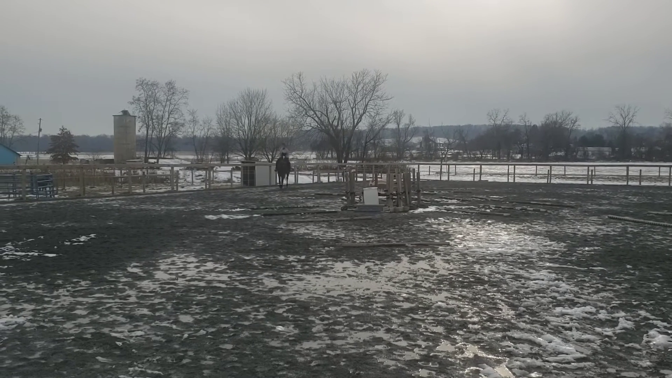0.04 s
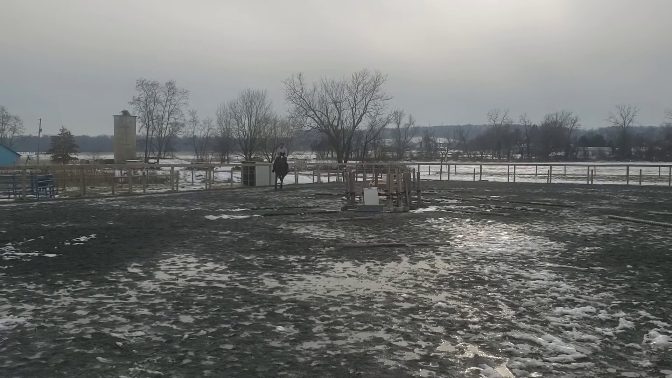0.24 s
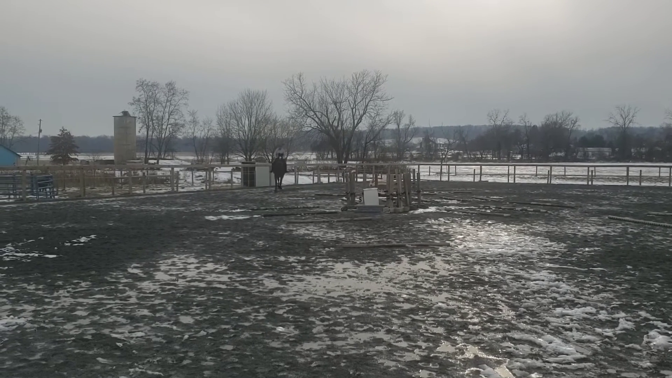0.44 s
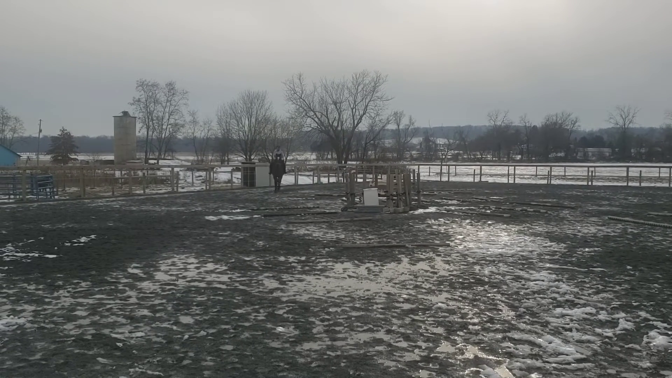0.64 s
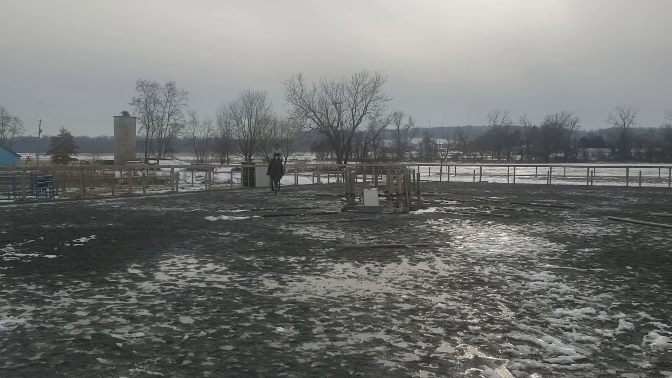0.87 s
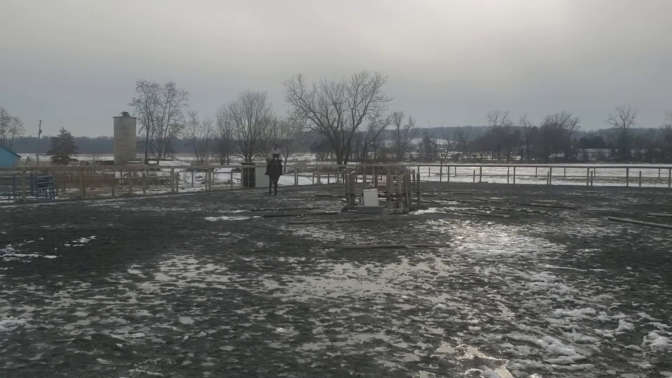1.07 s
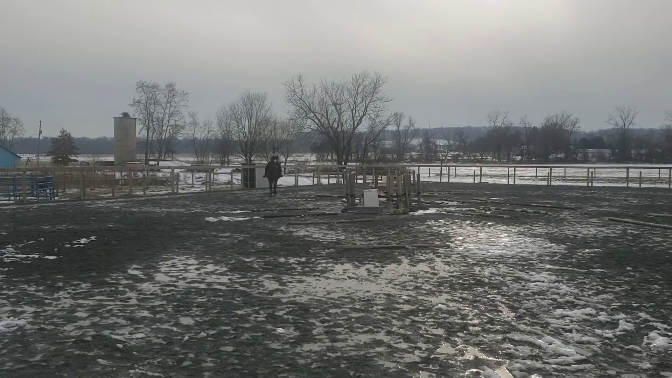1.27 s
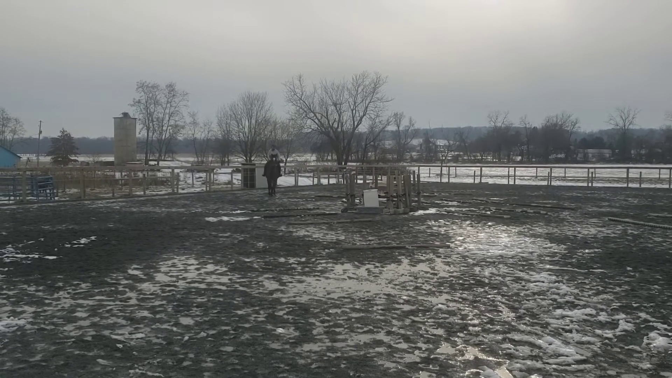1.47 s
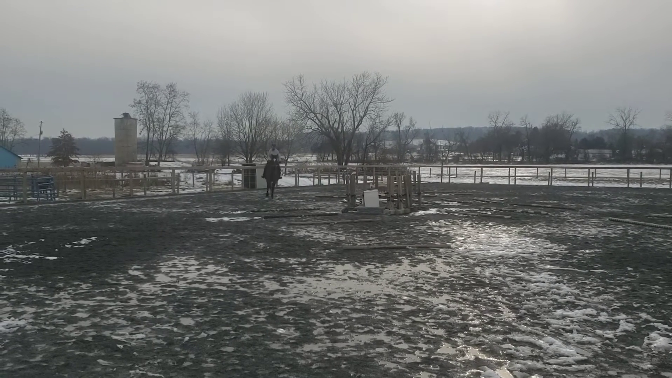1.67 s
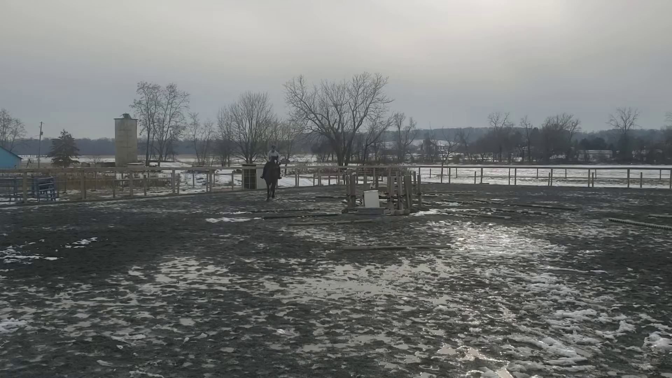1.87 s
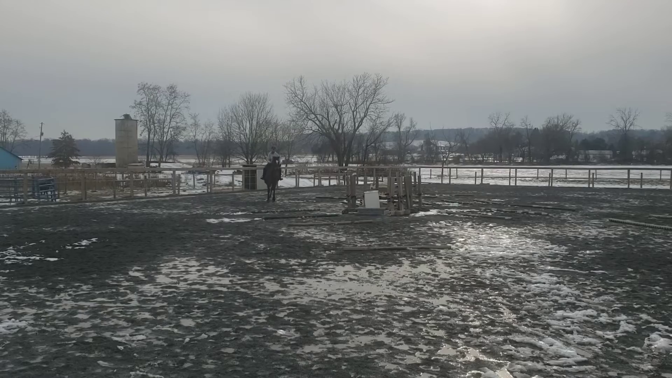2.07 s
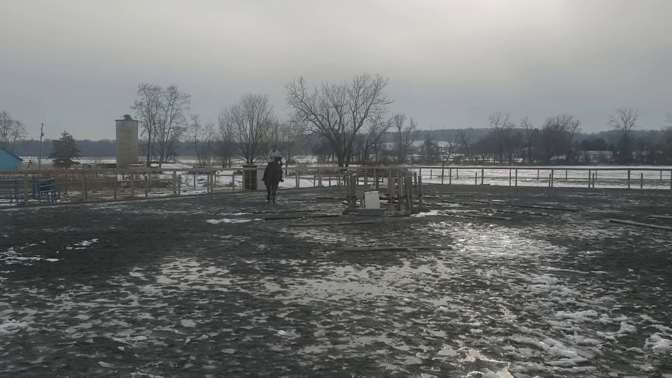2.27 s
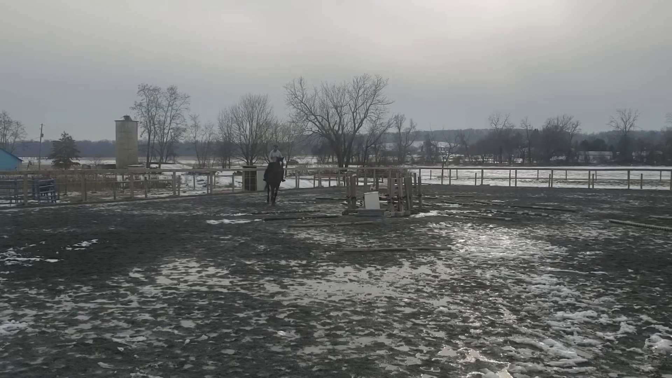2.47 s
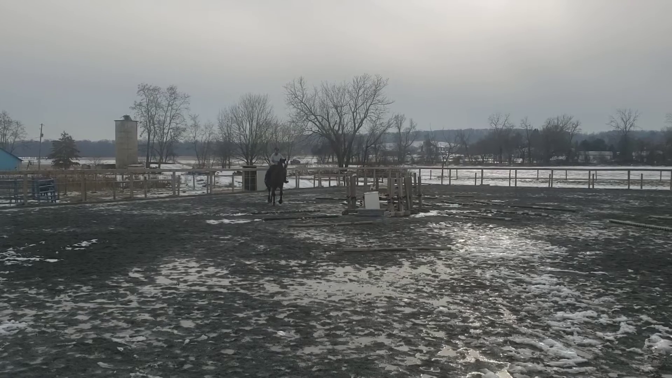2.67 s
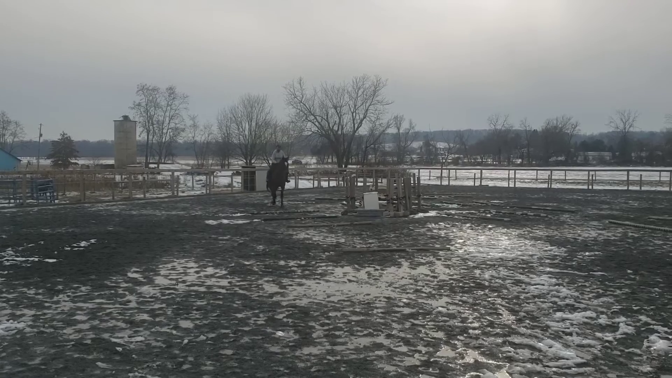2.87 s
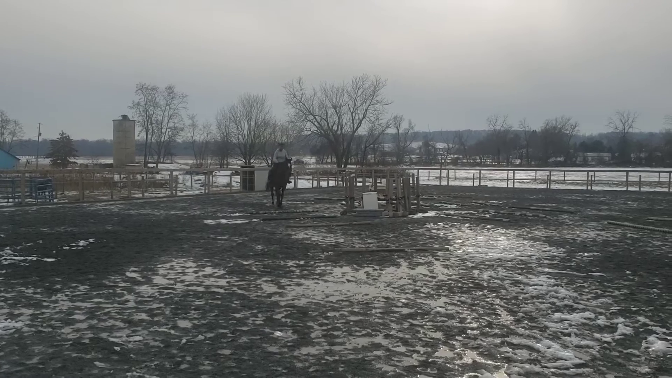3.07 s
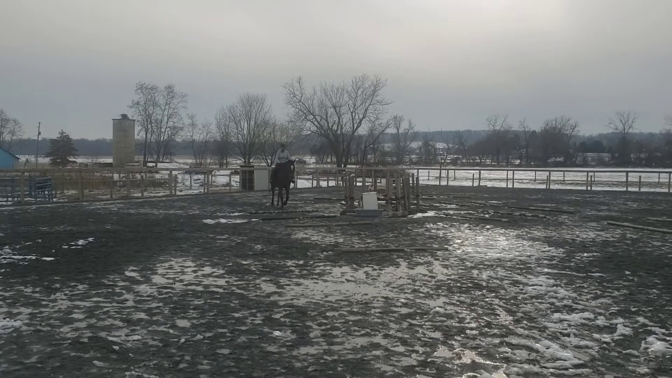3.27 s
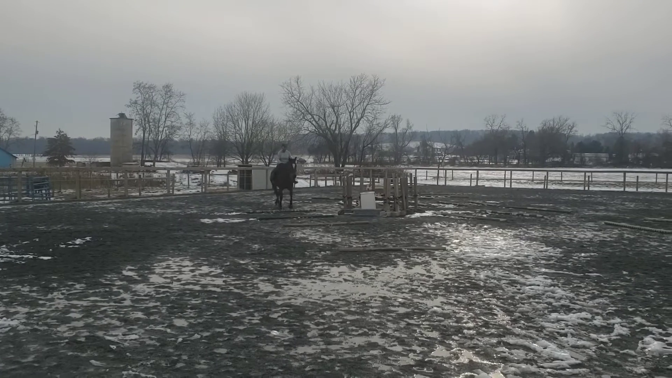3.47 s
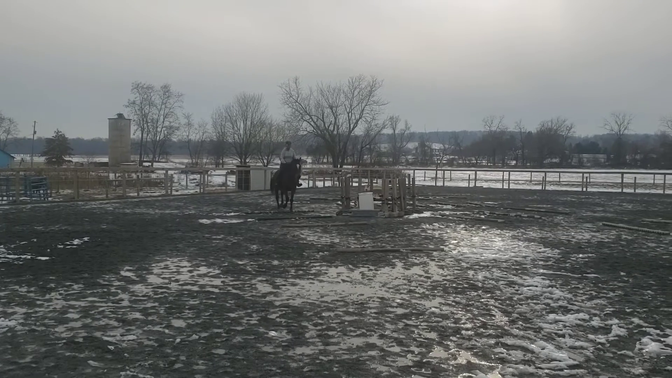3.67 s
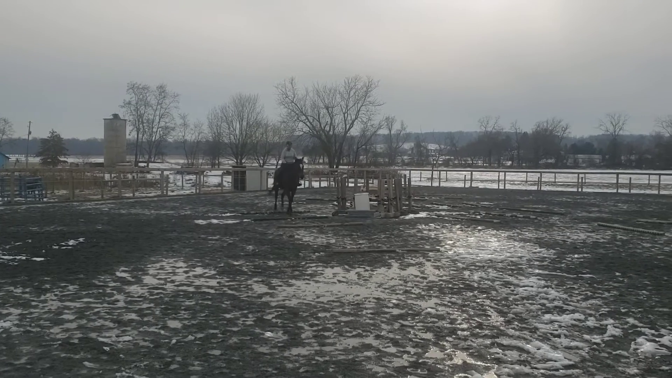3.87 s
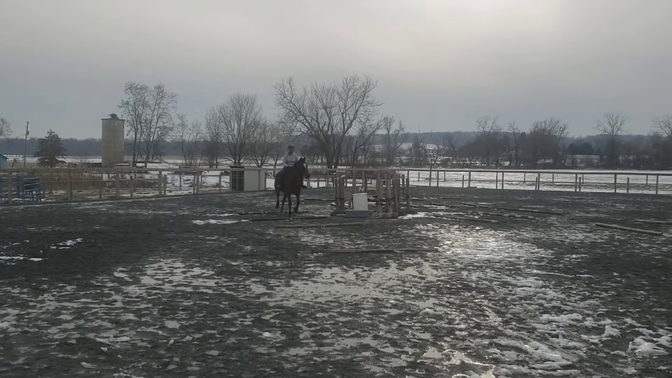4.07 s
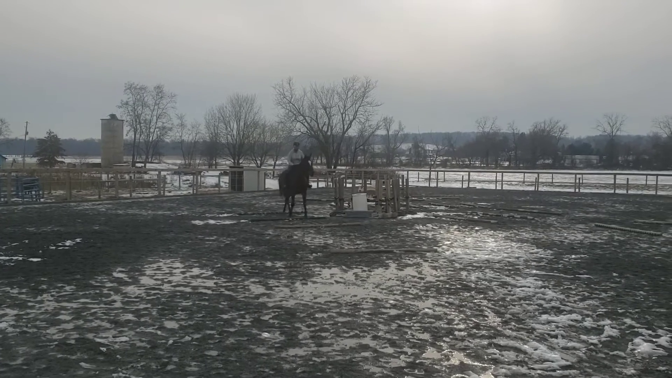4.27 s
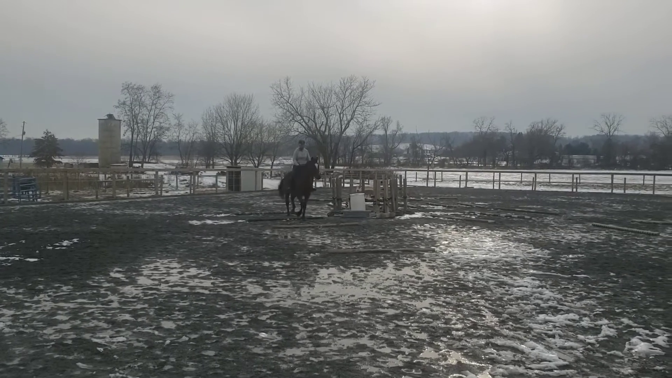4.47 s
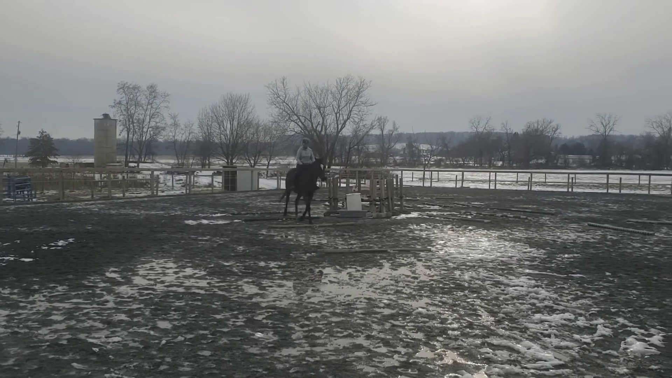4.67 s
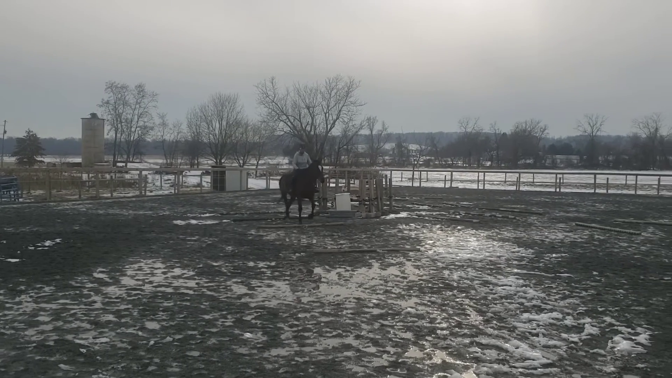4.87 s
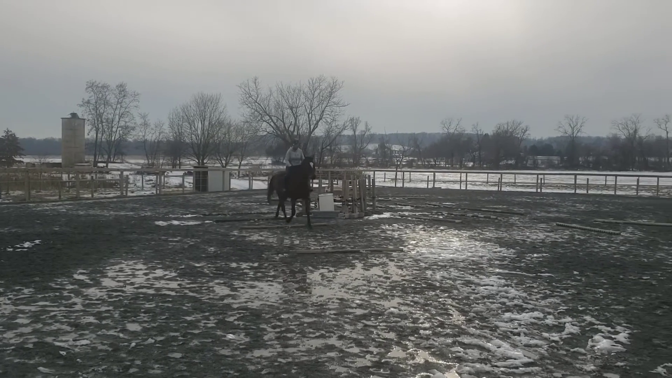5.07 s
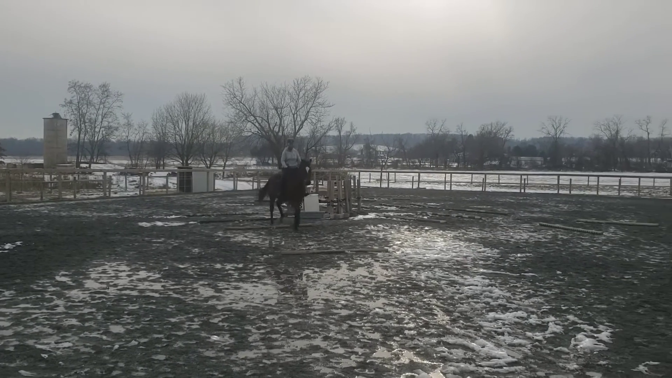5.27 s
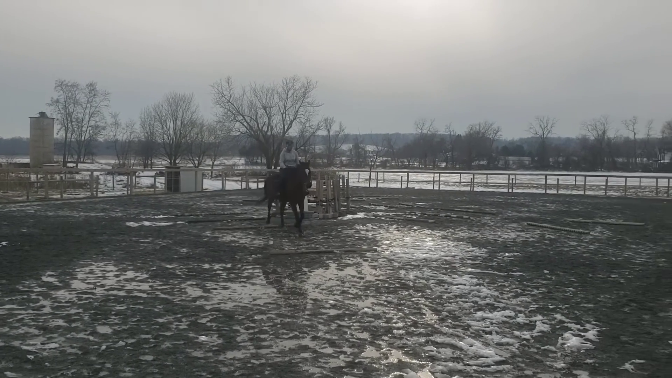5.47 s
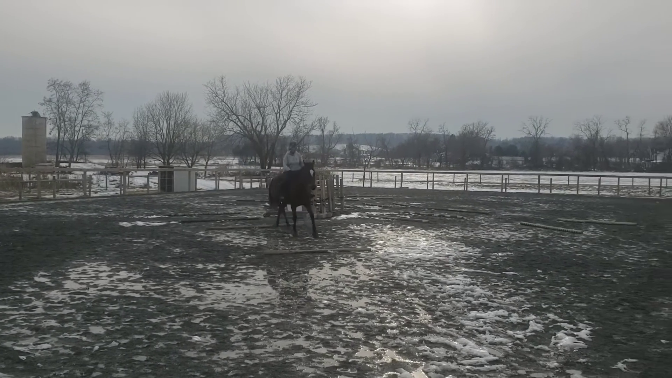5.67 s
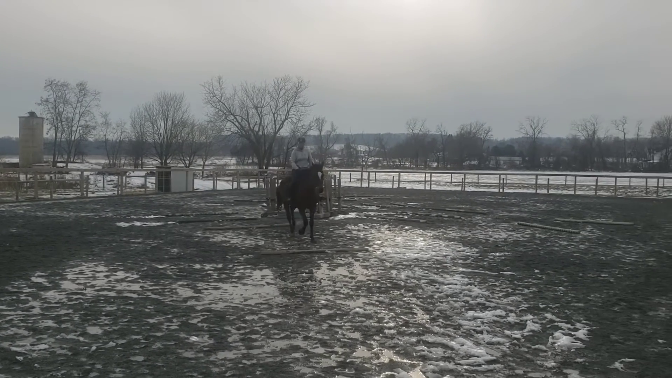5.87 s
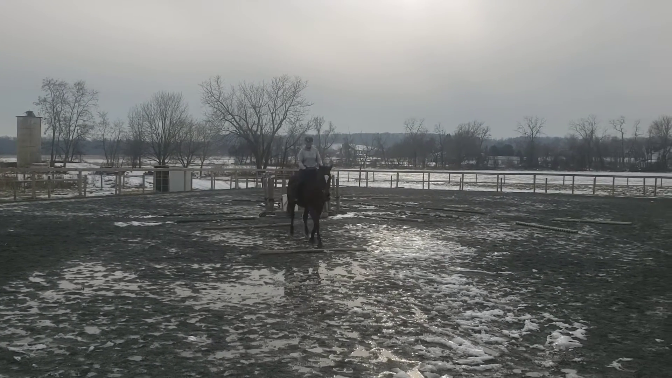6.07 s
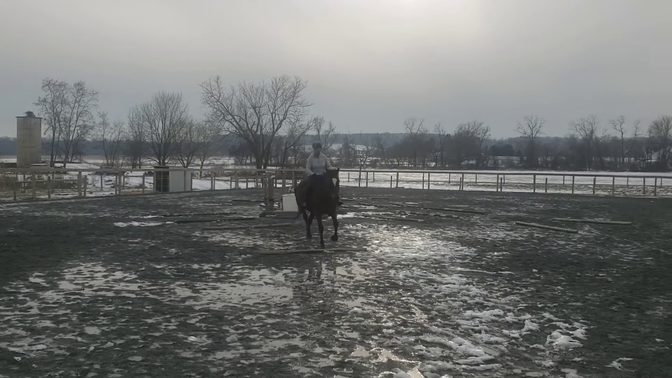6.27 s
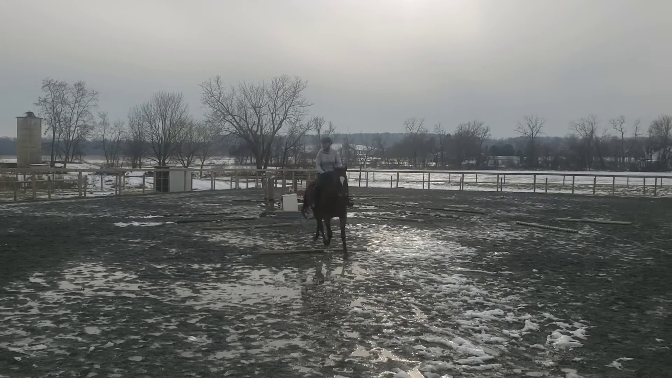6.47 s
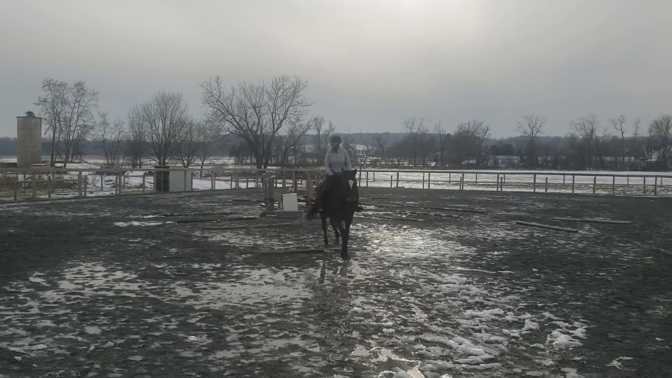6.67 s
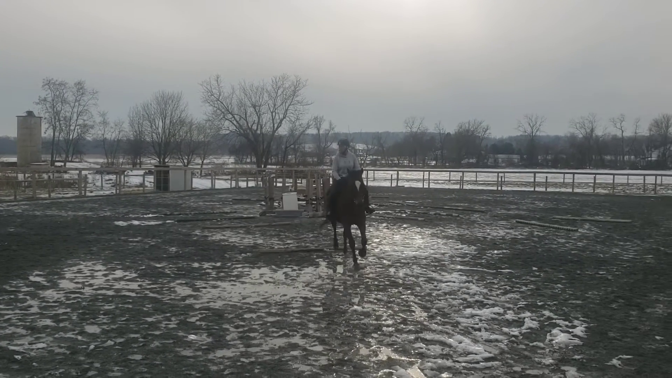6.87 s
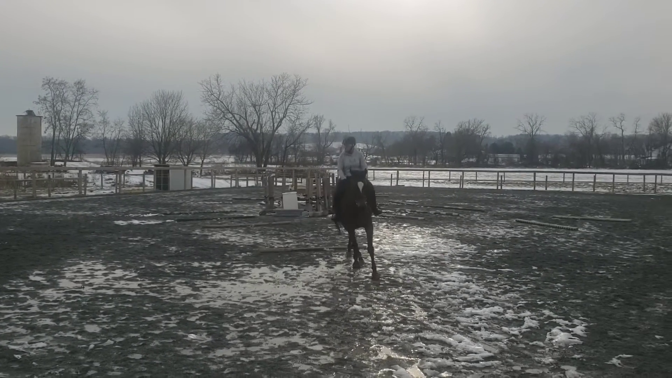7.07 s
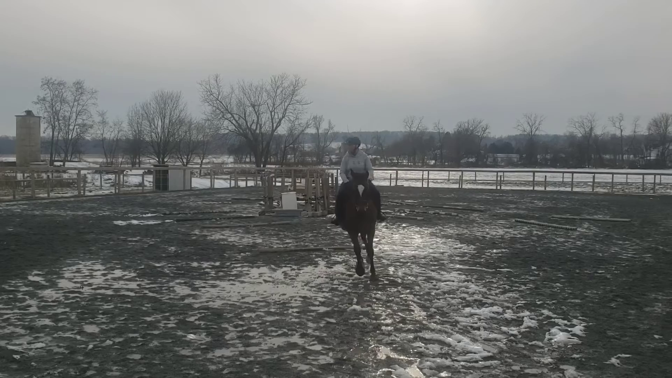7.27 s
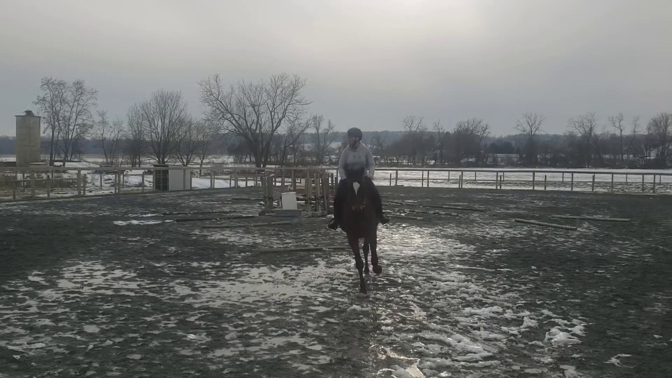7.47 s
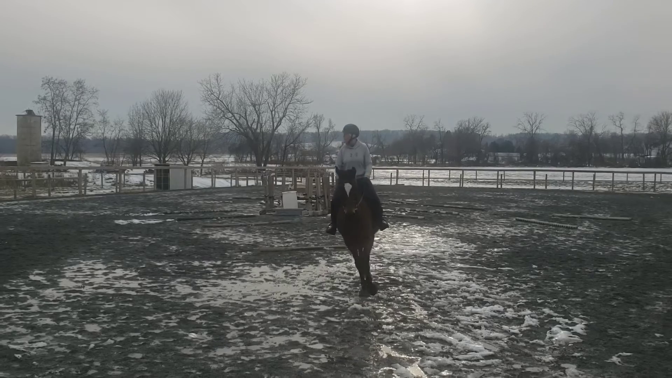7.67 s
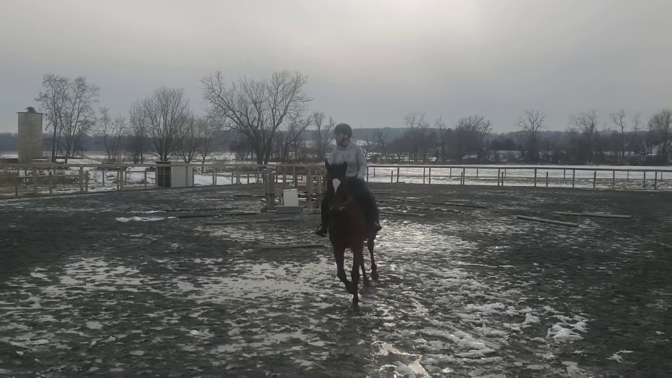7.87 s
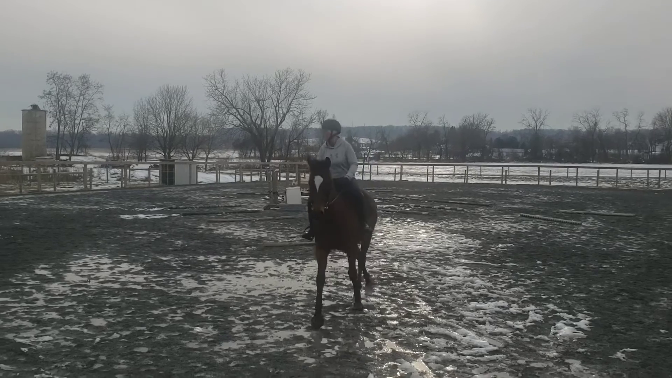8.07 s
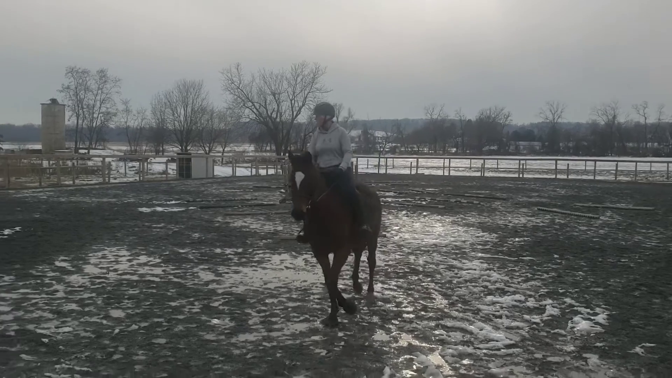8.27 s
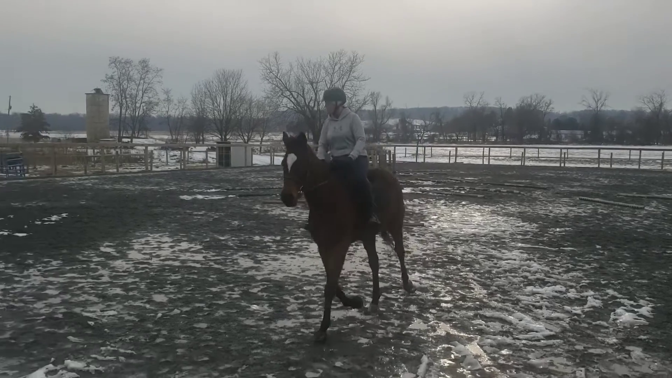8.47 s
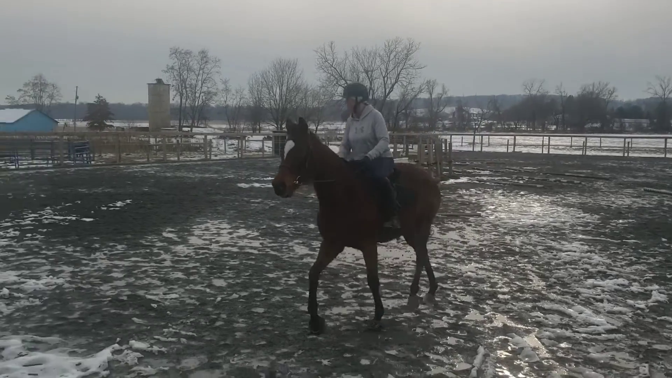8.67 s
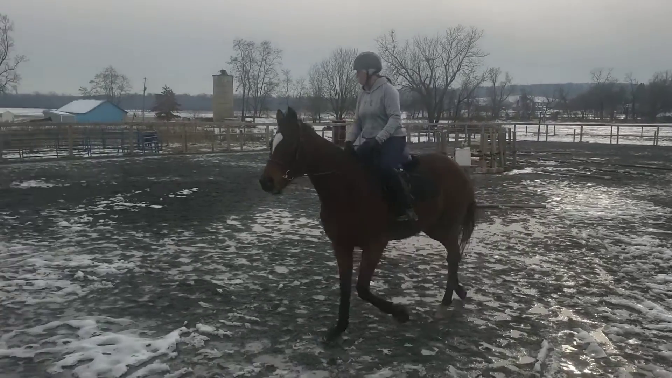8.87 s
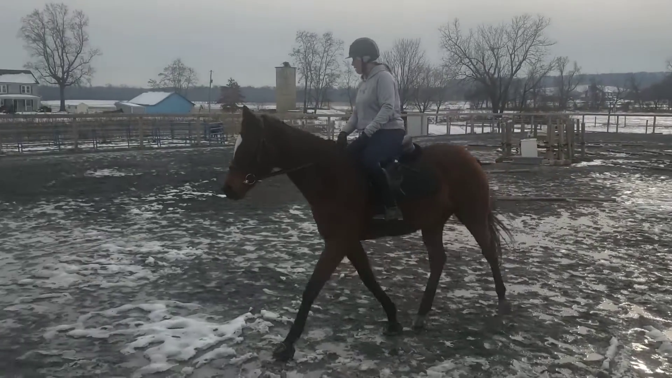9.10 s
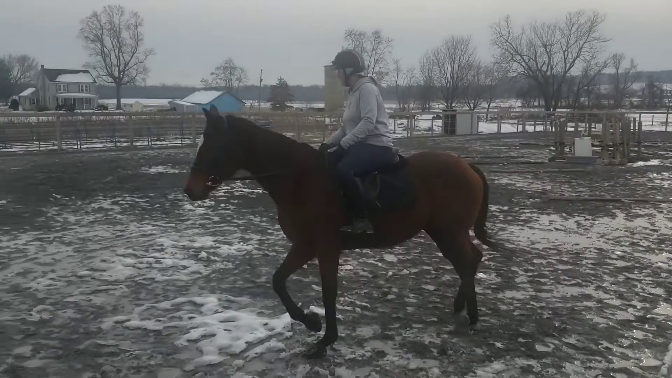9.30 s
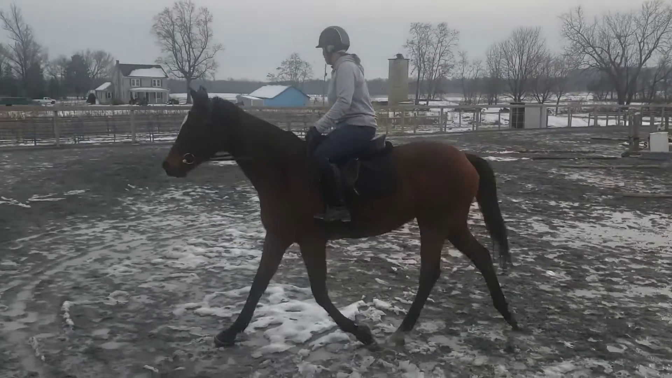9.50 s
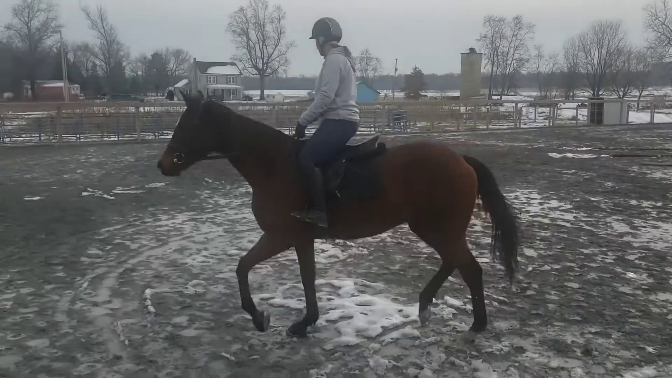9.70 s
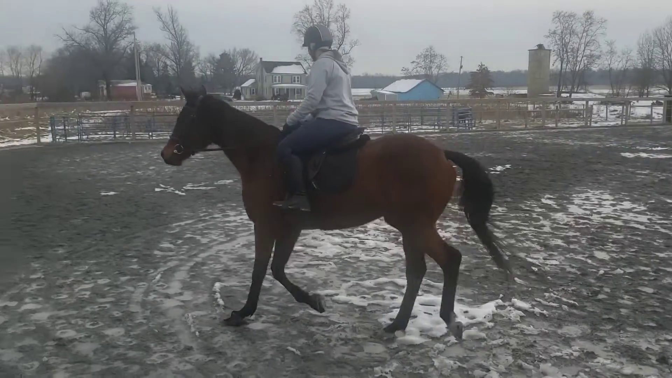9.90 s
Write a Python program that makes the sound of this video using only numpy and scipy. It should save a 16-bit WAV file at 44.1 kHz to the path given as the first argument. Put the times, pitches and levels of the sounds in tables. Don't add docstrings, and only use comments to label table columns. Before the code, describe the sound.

A horse trots closer over icy slush, each hoof crunching, cracking and splashing louder in steady rhythm, above a low engine drone outdoors.

```python
import sys
import numpy as np
from scipy import signal
from scipy.fft import rfft, irfft, next_fast_len
from scipy.io import wavfile
from scipy.ndimage import uniform_filter1d

SR = 44100
rng = np.random.default_rng(int(sys.argv[2]) if len(sys.argv) > 2 else 0)


def volts_from_db(level):
    exponent = np.asarray(level, float) / 20
    return 10 ** exponent


def digitize_waveform(pressure):
    field = np.atleast_2d(pressure).T
    bounded = np.clip(field, -1, 1)
    quanta = np.round(bounded * 32767).astype(np.int16)
    wavfile.write(sys.argv[1], SR, quanta)


N = 438354
HZ = np.fft.rfftfreq(next_fast_len(N), 1 / SR)
TIME = np.arange(N) / SR


def evened(x):
    return x / np.sqrt(np.mean(x ** 2) + 1e-20)


def read(points, hz):
    f, value = np.transpose(points)
    return np.interp(np.log(hz + 1), np.log(f + 1), value)


def over_time(points):
    return np.interp(TIME, *np.transpose(points))


def shaped(x, gain):
    return irfft(rfft(x, next_fast_len(N)) * gain, next_fast_len(N))[..., :N]


def below(edge_hz, order=4):
    return 1 / (1 + (HZ / edge_hz) ** (2 * order))


def drift(per_s, channels=1):
    return evened(shaped(rng.standard_normal((channels, N)), np.sqrt(below(per_s, order=1))))


# f/Hz, phase/rad
PORT_LAG = [(300, 0), (6000, -.3), (11000, -2), (15000, -4.5)]


def crackle(per_s, spread_db, clump_db, pocket_db, same):
    size = volts_from_db(spread_db * np.minimum(rng.exponential(1, (2, N)), 5)) * rng.standard_normal((2, N))
    snapping = rng.random((2, N)) < per_s / SR
    direct, other = size * snapping * volts_from_db(clump_db * drift(270))
    same = same + (.95 - same) * below(1450, order=1)
    right = shaped(direct, same * np.exp(-1j * read(PORT_LAG, HZ)))
    right = right + shaped(other, np.sqrt(1 - same ** 2))
    z = signal.stft(np.array([direct, right]), nperseg=256, noverlap=192)[2]
    chance = rng.standard_normal(z.shape[1:])
    narrow = evened(uniform_filter1d(uniform_filter1d(chance, size=2, axis=0), size=20, axis=1))
    wide = evened(uniform_filter1d(uniform_filter1d(chance[::-1], size=14, axis=0), size=5, axis=1))
    z = z * volts_from_db(pocket_db * evened(narrow + wide))
    return evened(signal.istft(z, nperseg=256, noverlap=192)[1][:, :N])


# t/s of peak, level/dB, rise/ms per 20 dB, fall/ms per 20 dB
STEPS = [(.1966, -58.5, 94, 96), (.5637, -52.5, 102, 71), (0.924, -55, 81, 44), (1.2811, -48.5, 58, 51),
         (1.612, -47, 38, 57), (1.9675, -52.5, 117, 65), (2.3068, -50.5, 49, 64), (2.649, -55.5, 103, 116),
         (2.9633, -52.5, 37, 115), (3.3554, -51.5, 49, 68), (3.728, -49.5, 101, 36), (4.1007, -49, 53, 55),
         (4.4589, -46, 77, 32), (4.843, -47, 55, 50), (5.1953, -50.5, 54, 82), (5.5504, -43, 57, 54),
         (5.892, -40, 51, 36), (6.233, -37, 31, 34), (6.56, -37, 49, 48), (6.913, -37, 59, 50),
         (7.219, -36, 33, 70), (7.57, -38, 57, 54), (7.892, -31.5, 50, 41), (8.1975, -26.5, 31, 38),
         (8.5464, -26, 46, 45.5), (8.89, -28.5, 59, 33), (9.234, -28.5, 57, 36), (9.5924, -24.5, 55, 27.5),
         (9.905, -30.5, 42, 125)]
# t/s, level/dB
STEP_FIZZ = [(0, -28), (1.5, -1.5), (6, -4.5), (7, -1), (9.9, 3)]
# t/s of peak, level/dB, fall/ms per 20 dB, fizz/dB
SPLATS = [(.0668, -66, 23, -26), (.3113, -59, 48, -4), (1.3429, -58, 27, -17), (2.0314, -57.5, 39, -2),
          (2.9433, -47.5, 30, 1), (3.1219, -58, 45, 8), (4.1974, -54, 32, -19), (4.3142, -59.5, 146, -23),
          (4.7632, -54, 48, -21), (5.1084, -56.5, 48, -22), (5.4881, -49.5, 44, -30),
          (5.8228, -53, 82, -24), (5.8778, -36, 17, 7), (6.497, -46.5, 55, -9), (6.813, -53, 31, 5),
          (6.853, -51, 34, -18.5), (6.9334, -37, 27, -6), (6.979, -57.5, 101, 3), (7.0773, -49.5, 132, 11),
          (7.3962, -47.5, 82, 11), (7.5585, -27.5, 30, 4), (8.171, -34, 50, 17), (8.686, -38, 41, 9.5),
          (8.82, -41.5, 29, -22), (9.0455, -53, 24, 3), (9.3555, -42, 39, 10), (9.4777, -43, 34, 25),
          (9.544, -31.5, 32, -7), (9.7588, -41, 177, 11), (9.8028, -28.5, 10, 3.5)]
# t/s of peak, level/dB, rise and fall/ms per 20 dB, fizz/dB
SCUFFS = [(.6465, -58.5, 104, -16), (1.0643, -52, 5, 10), (1.1158, -55, 43, 17), (1.1993, -58, 40, -6),
          (4.6255, -53.5, 15, -13), (4.7274, -58, 25, -25), (5.3426, -54.5, 26, -22),
          (5.4426, -58, 45, -23), (5.556, -42, 12, 2), (5.6741, -59.5, 114, -2), (5.9445, -61.5, 113, -1),
          (6.166, -48, 37, -12), (6.3889, -56.5, 80, -7), (6.4444, -53.5, 18, -15), (6.887, -38, 19, 10),
          (7.5146, -44.5, 60, 1.5), (7.751, -36.5, 13, 12.5), (7.875, -22.5, 16, 20),
          (8.312, -53.5, 130, 12), (8.471, -40, 18, 10), (8.521, -23.5, 10, 2), (8.6284, -52, 110, -1),
          (8.732, -48.5, 40, 0), (8.9417, -51, 107, 4), (9.0714, -50, 67, 12), (9.316, -24.5, 26, 10.5),
          (9.4176, -45.5, 122, 24), (9.5316, -39, 18, -9), (9.682, -27.5, 28.5, -1), (9.851, -38.5, 41, -3)]
# t/s of peak, level/dB, rise/ms per 20 dB, fizz/dB
PULLS = [
    (3.9181, -57, 95, -21),
    (5.2, -37, 46, -10),
    (6.3173, -53, 51, -10),
    (6.687, -59, 124, 8),
    (7.469, -49.5, 73, -4),
    (7.6907, -53, 88, 5),
    (7.7883, -57, 49, 12),
    (8.503, -39, 26, -8),
    (8.8434, -35.5, 20, -17),
]
# t/s of peak, level/dB, fizz/dB
SNAPS = [(.2694, -62, -22), (.621, -42, -11), (1.1444, -54, 11), (1.1733, -53, -9), (1.2676, -40.5, -3),
         (1.3819, -50.5, -9), (1.4617, -52.5, 18), (1.5697, -48.5, -7), (1.588, -46, 2), (1.798, -53.5, -3),
         (2.5834, -46.5, 22), (2.8515, -52, -29), (3.057, -46.5, -6), (3.2127, -59.5, 5),
         (3.6178, -50, -23), (3.8373, -54, -3), (4.1705, -49.5, -4), (5.626, -46.5, -8), (7.715, -48, 14),
         (7.813, -40.5, 2), (7.9459, -50, 12), (9.132, -39, 27), (9.159, -39, -13), (9.286, -26.5, 10),
         (9.439, -43, 5), (9.667, -28.5, 16), (9.889, -25, 3)]
SPLAT_RISE_MS, SPLAT_RISE_SHARE, PULL_FALL_SHARE, SNAP_RISE_MS, SNAP_FALL_MS = 3.4, 0.18, 0.3, 3.7, 12.7
STEP_WET_DB, SPLAT_WET_DB, SCUFF_WET_DB, PULL_WET_DB, SNAP_WET_DB = -9, -8.5, -10.5, -14.5, -10
WET_DB_PER_DOUBLING = 2.5


def footfalls():
    steps = [(s, db, rise, fall, np.interp(s, *np.transpose(STEP_FIZZ))) for s, db, rise, fall in STEPS]
    splats = [(s, db, SPLAT_RISE_MS + SPLAT_RISE_SHARE * ms, ms, fizz) for s, db, ms, fizz in SPLATS]
    scuffs = [(s, db, ms, ms, fizz) for s, db, ms, fizz in SCUFFS]
    pulls = [(s, db, ms, PULL_FALL_SHARE * ms, fizz) for s, db, ms, fizz in PULLS]
    snaps = [(s, db, SNAP_RISE_MS, SNAP_FALL_MS, fizz) for s, db, fizz in SNAPS]
    kinds = [(STEP_WET_DB, steps), (SPLAT_WET_DB, splats), (SCUFF_WET_DB, scuffs),
             (PULL_WET_DB, pulls), (SNAP_WET_DB, snaps)]
    crunches = []
    for wet_db, rows in kinds:
        for s, db, rise, fall, fizz in rows:
            squelch_db = wet_db + WET_DB_PER_DOUBLING * np.log2(abs(rise + fall) / 100)
            crunches.append((s, db, rise, fall, squelch_db, fizz))
    return crunches


# t/s, level/dB, fizz/dB
CRACKS = [(0.068, -41.5, -32), (0.5679, -38, -21), (1.2808, -41, -19), (2.306, -35.5, -27), (3.121, -54, 6),
          (3.3554, -39.5, 0), (5.202, -37, 7), (5.89, -29.5, 14), (6.5632, -22.5, -12), (6.911, -25.5, 22),
          (7.0769, -44, 8), (7.172, -30, -24), (7.396, -38, 36), (7.5701, -19.5, 1), (7.776, -46, 8),
          (7.7953, -45, 12), (7.892, -23.5, 7), (8.471, -37, -17), (8.546, -17, 15), (8.685, -33.5, 12),
          (8.892, -18.5, 10), (9.2340, -16, 14), (9.4175, -39, 9), (9.5879, -17, 12)]
# t/s, level/dB
CHIPS = [(2.503, -47), (2.714, -57), (2.7476, -54), (3.441, -48), (3.491, -59), (3.542, -55), (3.895, -47),
         (3.906, -54), (3.915, -46), (4.313, -47), (6.98, -52), (7.139, -45), (8.0365, -50), (8.059, -58),
         (9.045, -52), (9.142, -53), (6.31, -47.5)]
# t/s, level/dB
GRIT = [(0.0504, -62), (0.5457, -40), (0.754, -46.5), (0.8445, -45.5), (0.9137, -33), (1.2511, -44),
        (1.6113, -36), (2.0694, -52), (2.1884, -51), (2.2095, -41), (2.4628, -56), (2.5252, -44),
        (3.3388, -39), (4.0277, -56), (4.441, -34), (4.559, -47), (4.8254, -35), (4.8393, -30),
        (5.1602, -40), (5.1781, -29), (5.1934, -31), (5.3951, -47), (5.6728, -40)]
# t/s, level/dB, fall/ms per 20 dB, fizz/dB
BITES = [(5.5475, -21.5, 24, 2), (5.874, -33, 28, 0), (6.542, -28, 30, 8), (6.551, -21, 21, 9),
         (7.2015, -27, 28, 6), (7.215, -19, 44, -4), (8.185, -20, 30, -3), (8.4963, -27, 34, -4),
         (8.8189, -41, 30, -6), (8.861, -15.5, 42, 10), (9.1847, -25, 30, -14), (9.198, -19.5, 30, 0),
         (9.206, -20, 30, 9), (9.304, -21.5, 60, 5), (9.5282, -30, 30, -6), (9.8874, -26, 32, 2)]
BITE_DB, BITE_RISE_MS, SETTLE_DB, SETTLE_WET_DB, SETTLE_MS = -11.5, 1.2, -21, -3, 136


def sudden_cracks():
    cracks = [(s, db + 0.5, 1.8, 7., -27., fizz_db) for s, db, fizz_db in CRACKS]
    cracks += [(s + 0.00068, db + 3.0, 1.5, 4., -32., 1.5) for s, db in CHIPS]
    cracks += [(s + 0.0016, db - 9.5, 1.2, 7., -30., 0.5) for s, db in GRIT]
    cracks += [(s + 0.0007, db + BITE_DB, BITE_RISE_MS, ms, -17., fizz_db) for s, db, ms, fizz_db in BITES]
    cracks += [(s, db + SETTLE_DB, 30., SETTLE_MS, SETTLE_WET_DB, 0.5) for s, db, *_ in STEPS]
    return cracks


# t/s, level/dB
SPRAY = [
    (0.0, -63.5),
    (3.32, -69.5),
    (4.12, -59.5),
    (6.89, -67.5),
    (7.06, -57),
    (8.0, -53.5),
    (8.89, -53),
    (9.94, -56),
]


def spray_power():
    spray_db = over_time(SPRAY) + 2.5 * drift(6.1)
    nearness = np.interp(TIME, [6.5, 8.], [0, 1])
    drop_size = volts_from_db(8 + 5. * rng.exponential(1, (3, N)).clip(0, 2.5))
    drops = drop_size * (rng.random((3, N)) < 13 / SR)
    patter = 1 + signal.lfilter([1], [1, -np.exp(-1 / (.001 * SR))], drops)
    band_db = np.array([[-6.], [7.], [2.5]]) + nearness * np.array([[-14.], [-5.], [2.5]])
    return patter * volts_from_db(2 * (spray_db + band_db))


def with_distance(near):
    sheen = shaped(near, 1 - below(10700, order=6))
    dip = shaped(near, below(4100, order=8) - below(2930))
    near = near - dip * (1 - volts_from_db(np.interp(TIME, [1.5, 4., 7.], [-5., -3., -0.5])))
    ring = shaped(near, below(4780, order=12) - below(4400, order=12))
    near = near + ring * (volts_from_db(np.interp(TIME, [1.5, 6.5], [3., 0.3])) - 1)
    return near - sheen * (1 - volts_from_db(np.interp(TIME, [0, 4., 6.5], [-7., -8., 0])))


# t/s, squelch level/dB, deep mud level/dB
GROUND = [(0, -4.5, 10), (.75, -2.5, 2.5), (.95, 2.5, 10), (1.2, -5, 7), (2.5, -4.5, 8), (4.5, -2.5, 6),
          (5.6, 2.5, 2.5), (6.2, -3, 0.5), (6.9, -0.5, 7.5), (7.2, 2, 4), (7.9, 2.5, 2.5), (8.5, 2, -0.5),
          (8.9, 0, -1), (9.25, 5, -1.5), (9.6, -1.5, -4.5), (9.94, -1, -0.5)]


def slush():
    power = np.zeros((3, N))
    for s, db, rise_ms, fall_ms, squelch_db, fizz_db in footfalls() + sudden_cracks():
        around = slice(max(round((s - .16) * SR), 0), round((s + 0.3) * SR))
        ms = 1000 * (TIME[around] - s)
        shape_db = -20 * np.maximum(-ms / max(rise_ms, 1), ms / max(fall_ms, 1))
        crust_db = db - 10 * np.log10(1 + volts_from_db(2 * fizz_db))
        band_db = crust_db + np.array([[squelch_db + 17.5], [11.], [fizz_db + 19.0]])
        power[:, around] += volts_from_db(2 * shape_db) * volts_from_db(2 * band_db)
    at, wet_db, mud_db = np.transpose(GROUND)
    power[0] *= volts_from_db(2 * np.interp(TIME, at, wet_db))
    power += spray_power()
    grains = crackle(per_s=24000, spread_db=.8, clump_db=1.3, pocket_db=3.2, same=.3)
    low, high = below(3950, order=6), below(7960)
    shares = [low * (1 - below(550, order=3)), high - low, 1 - high]
    near = 0
    for p, share in zip(power, shares):
        near = near + np.sqrt(p) * evened(shaped(grains, np.sqrt(abs(share))))
    near = near + (volts_from_db(np.interp(TIME, at, mud_db)) - 1) * shaped(near, below(1220, order=3))
    return with_distance(near)


# t/s, level/dB, f/Hz, time to fall 60 dB/s
THUDS = [(5.55, -47, 178.6, 0.045), (5.887, -48.5, 171, 0.059), (6.22, -47.5, 383, 0.025),
         (6.557, -54, 298, 0.04), (6.907, -51, 237, 0.078), (7.21, -45.5, 173, 0.054),
         (7.562, -38, 244, 0.039), (7.89, -33, 167, 0.019), (8.186, -52.5, 230, 0.064),
         (8.539, -47, 196, 0.083), (8.887, -49, 153, 0.037), (9.228, -33, 158, 0.039),
         (9.586, -22.5, 156, 0.01), (9.678, -46, 245, 0.047), (9.766, -47, 350, 0.029)]


def thuds():
    out, t = np.zeros(N + 8000), np.arange(8000) / SR
    for s, db, hz, t60 in THUDS:
        tone = np.sin(2 * np.pi * hz * t) + 0.56 * np.sin(2 * np.pi * 1.625 * hz * t)
        onset = 1 - np.exp(-t / 0.0032)
        out[round(s * SR):][:len(t)] += volts_from_db(db + 13.5 - 60 * t / max(t60, .01)) * onset * tone
    return out[:N]


# t/s, level/dB, f/Hz, time to fall 60 dB/s
DEEP_POCKETS = [(6.222, -43, 605, 0.044), (6.522, -41, 630, 0.05), (6.563, -45, 715, 0.05),
                (6.877, -38, 720, 0.054), (7.547, -38, 643, 0.05), (7.891, -33, 854, 0.054),
                (8.206, -33, 860, 0.059), (8.552, -42, 694, 0.05), (8.851, -44, 696, 0.07),
                (9.229, -30, 790, 0.057), (9.549, -36, 775, 0.05), (9.581, -39, 706, 0.083),
                (9.765, -51, 700, 0.03), (9.905, -41, 832, 0.05)]
MID_POCKETS = [(6.2202, -42, 1230, 0.036), (6.5635, -30.5, 2580, 0.033), (6.848, -44, 2540, 0.04),
               (6.9091, -36, 2540, 0.04), (7.2155, -35, 2430, 0.06), (7.557, -35, 1310, 0.043),
               (7.8116, -44, 1460, 0.033), (7.8754, -29, 2220, 0.037), (7.8872, -26.5, 2180, 0.04),
               (8.1635, -42, 2710, 0.04), (8.184, -29, 1330, 0.052), (8.493, -44, 2720, 0.029),
               (8.5296, -27.5, 1267, 0.06), (8.7277, -38.5, 1300, 0.015), (8.884, -25, 1725, 0.036),
               (9.1846, -33, 2857, 0.04), (9.2072, -27, 2960, 0.062), (9.2323, -27, 1610, 0.044),
               (9.549, -32, 2700, 0.047), (9.5838, -33, 2860, 0.055), (9.665, -46, 1750, 0.052),
               (9.8442, -38, 1470, 0.064), (9.8896, -38, 1720, 0.047)]
THIN_POCKETS = [(6.5635, -18.5, 4810, 0.028), (6.9097, -19.5, 5530, 0.037), (7.2145, -21.5, 4825, 0.035),
                (8.1858, -30, 5100, 0.03), (8.519, -29, 5100, 0.03), (8.546, -8.5, 5350, 0.021),
                (8.5694, -29, 4900, 0.03), (8.8624, -27, 5200, 0.033), (8.8844, -22, 5280, 0.03),
                (9.2126, -17, 5400, 0.033), (9.5846, -27, 4870, 0.03), (9.6818, -15.5, 4380, 0.022),
                (9.9044, -26, 5240, 0.033)]


def pockets():
    out, t = np.zeros(N + 4000), np.arange(4000) / SR
    for gain_db, rows in [(8.2, DEEP_POCKETS), (8.4, MID_POCKETS), (3.8, THIN_POCKETS)]:
        for s, db, hz, t60 in rows:
            flurry = rng.standard_normal(300) * np.exp(-t[:300] / 0.0024)
            ring = volts_from_db(-60 * t / max(t60, .006)) * np.sin(2 * np.pi * hz * t * (1 + 1.14 * t))
            sound = signal.fftconvolve(flurry, ring)[:len(t)]
            out[round(s * SR):][:len(t)] += volts_from_db(db + gain_db) * sound / abs(sound).max()
    return out[:N]


DRIP_S, DRIP_LENGTH_S, DRIP_HZ, DRIP_GLIDE, DRIP_DB = .757, .035, 6400, .21, -55


def drip():
    u = np.clip((TIME - DRIP_S) / DRIP_LENGTH_S, 0, 1)
    hz = DRIP_HZ * (1 + DRIP_GLIDE * np.sin(np.pi * u / 2))
    return volts_from_db(DRIP_DB) * np.sin(np.pi * u) * np.sin(2 * np.pi * np.cumsum(hz) / SR)


# t/s, shaft f/Hz, then level/dB of the tones at 2, 3 and 4 times the shaft speed
ENGINE = [(0, 30.08, -65, -60.5, -53.5), (.85, 30.58, -60, -58.5, -51), (1.3, 30.87, -53, -58, -48.5),
          (2.9, 31.47, -63, -56, -49), (3.74, 31.38, -60, -63, -52), (4.15, 30.06, -66, -78, -49.5),
          (4.6, 27.62, -52, -68, -57.5), (5.1, 27.18, -62, -65, -62.5), (6.2, 27.41, -52, -53.5, -53),
          (7.5, 27.29, -60, -46.5, -50.5), (8.25, 27.47, -65, -52.5, -53.5),
          (9.1, 27.37, -47.5, -48.5, -46.5), (9.94, 27.36, -55, -48, -48)]


def engine():
    s, hz, *levels_db = np.transpose(ENGINE)
    turns = np.cumsum(np.interp(TIME, s, hz)) / SR
    sway = drift(0.44, channels=6)
    sway_db, sway_phase = 1.2 * sway[:3], .15 * sway[3:]
    drone = np.zeros(N)
    for k, db in enumerate(levels_db):
        level = np.sqrt(2) * volts_from_db(np.interp(TIME, s, db) + sway_db[k])
        drone += level * np.cos(2 * np.pi * (k + 2) * turns + sway_phase[k])
    return drone


def hum():
    sway = drift(1.7, channels=2)
    turn = 2 * np.pi * 65.3 * TIME + 0.83 * sway[0]
    octave = np.interp(TIME, [4.3, 4.8], [.05, .4]) * np.cos(2 * turn)
    return volts_from_db(-51.5 + 0.42 * sway[1]) * (np.cos(turn) + octave)


# f/Hz, level/dB per Hz
WASH = [(20, -30), (40, -10), (60, -2), (95, -9), (150, -11), (250, -14), (500, -22), (1000, -28),
        (2000, -34), (4000, -40), (16000, -52)]
# t/s, level/dB
SWELL = [(0.0, -53), (4.57, -48), (4.9, -51), (9.83, -47.5), (9.94, -34.5)]
# f/Hz, likeness (-1 to 1)
SAME = [(60, 0.94), (180, 0.95), (550, 0.58), (1650, -0.66), (4970, 0.3), (15000, -0.76)]


def wash():
    frames, hz = N // 512 + 5, np.fft.rfftfreq(2048, 1 / SR)
    a, b, c, d, patches = rng.standard_normal((frames, 1025, 5)).T
    patches = evened(uniform_filter1d(uniform_filter1d(patches, size=9, axis=0), size=10, axis=1))
    same, left = np.clip(read(SAME, hz), -1, 1)[:, None], a + 1j * b
    right = same * left + np.sqrt(1 - same ** 2) * (c + 1j * d)
    z = np.array([left, right]) * volts_from_db(read(WASH, hz)[:, None] + 2.1 * patches)
    air = evened(signal.istft(z, nperseg=2048, noverlap=1536)[1][:, :N])
    rumble = shaped(air, np.sqrt(below(152, order=2)))
    hiss = shaped(air, np.sqrt(1 - below(2200, order=2)))
    hiss_db = np.interp(TIME, [0, 1.2, 4., 6., 7., 7.95, 8.05, 8.6, 9.4],
                        [1.0, 2.5, 9.0, 9.0, 9.0, 10.5, -18.0, -12.0, 4.0])
    road_db = np.interp(TIME, [.9, 1.3, 7.6, 8., 9.5], [6.0, -4.5, -3.5, 3.0, 2.0])
    road = (volts_from_db(road_db) - 1) * shaped(air, below(2300) - below(1130))
    steady = volts_from_db(-41.0) * (air - rumble + road + (volts_from_db(hiss_db) - 1) * hiss)
    return steady + volts_from_db(over_time(SWELL) + 16.5) * rumble


def scene():
    return slush() + volts_from_db(15.5) * (thuds() + engine() + hum()) + wash() + pockets() + drip()


# t/s, delay/ms
HAND = [(0, 1.03), (1.6, 1.02), (2.5, .97), (5, .98), (6.2, 1.0), (6.8, 1.05), (7.2, 1.05), (7.8, .94),
        (9.94, .95)]


def with_hand_echo(dry):
    echo = shaped(dry, 1.05 * (below(4500) - below(1750)))
    tremble = drift(1.5, channels=2)
    late = TIME - over_time(HAND) / 1000 - 4e-5 * tremble[0]
    echo = np.array([np.interp(late, TIME, port) for port in echo])
    strength = np.interp(TIME, [1.3, 2.2, 7., 8.], [.4, .62, .62, .3])
    return dry - strength * (1 + .25 * tremble[1]) * echo


# f/Hz, level/dB
LEFT = [(500, -14.5), (1400, -10.5), (2050, -19), (2650, -16), (3150, -12), (3900, -6.5), (5100, -8.5),
        (6300, -17.5), (7200, -13.5), (8400, -19), (10300, -11.5), (12000, -12.5), (14000, -23),
        (15700, -19.5)]
RIGHT = [(500, -16.5), (1400, -18.5), (2050, -21), (2650, -16.5), (3400, -27.5), (4200, -25), (5800, -24.5),
         (6400, -49), (9000, -36.5), (10500, -29), (12000, -17.5), (13000, -12), (14500, -21.5),
         (15700, -30)]
# f/Hz, level/dB
BODY = [(380, -0.5), (520, -3), (740, 0.5), (1010, -4), (1280, -0.5), (1560, -1), (1800, 4), (3700, -1.5),
        (4400, -4.5), (4800, 0.5), (5250, 1), (5900, -0.5)]


def through_ports(held):
    ports = volts_from_db(np.array([read(LEFT, HZ), read(RIGHT, HZ)]) + read(BODY, HZ))
    edge = np.sqrt(below(15850, order=150) + volts_from_db(-84.)) * (1 - below(30, order=2))
    self_noise = volts_from_db(-73.5) * shaped(rng.standard_normal((2, N)), 1 - below(12500, order=3))
    return shaped(shaped(held, ports) + self_noise, edge)


def top_cut(x):
    return signal.sosfilt(signal.butter(12, 16930, fs=SR, output="sos"), x)


def record(dry):
    mix = through_ports(with_hand_echo(dry))
    return top_cut(mix)


dry = scene()
out = record(dry)
digitize_waveform(out)
```